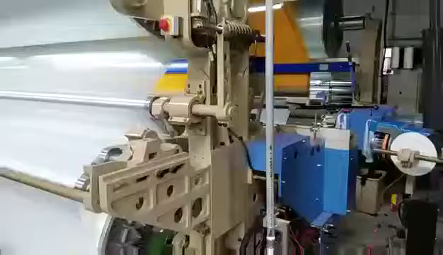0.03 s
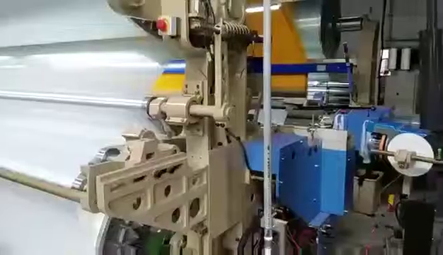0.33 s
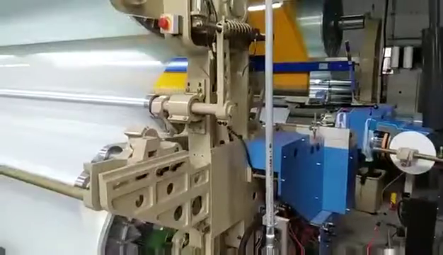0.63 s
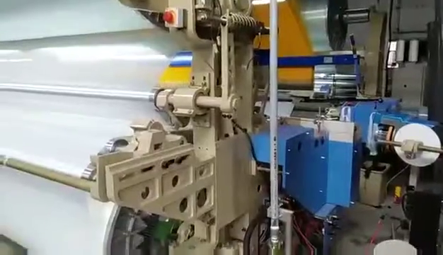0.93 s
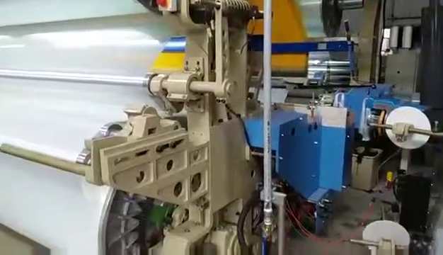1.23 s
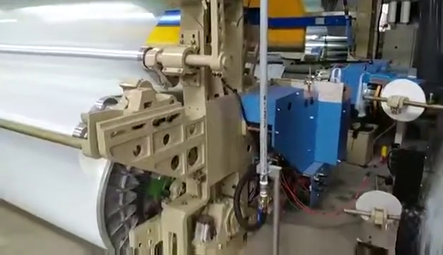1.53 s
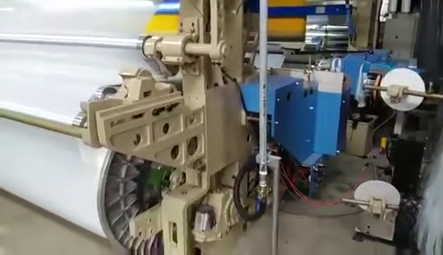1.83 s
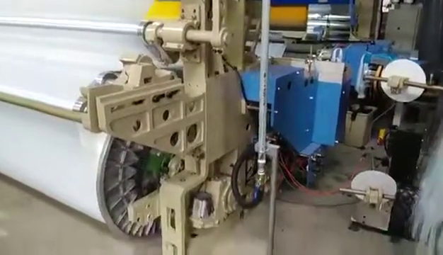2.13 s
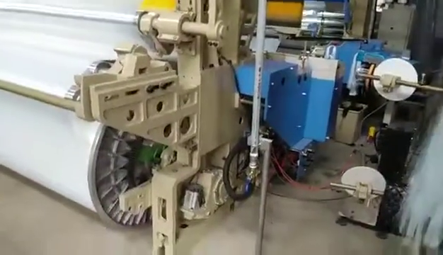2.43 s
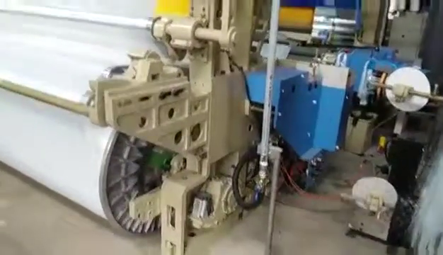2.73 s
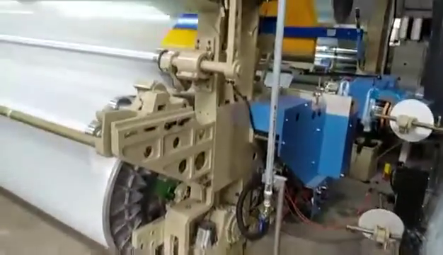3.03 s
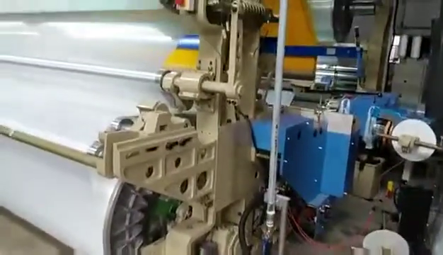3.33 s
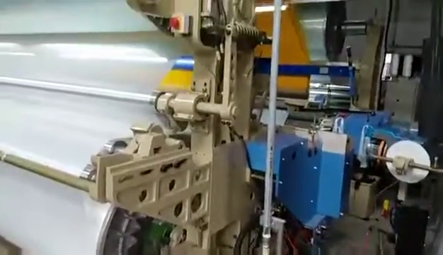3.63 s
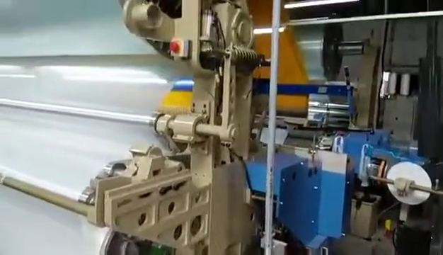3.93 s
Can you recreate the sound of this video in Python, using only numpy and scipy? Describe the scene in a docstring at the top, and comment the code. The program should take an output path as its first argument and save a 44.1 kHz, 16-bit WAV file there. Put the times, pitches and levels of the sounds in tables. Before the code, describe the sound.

Industrial loom pulsing rapidly with air bursts and metal rattle in a noisy mill.

```python
"""A jet loom weaves at nearly six picks a second, close to a moving phone in a roaring mill.
Each pick opens the hissing main nozzle, then the relay nozzles. The frame rattles, faint tones ring and
the reed beats up, over a drive that repeats every two picks, whining gears and the other looms.
The sound cuts in abruptly; 1.5 s later the phone's suppressor has learnt the roar and turns it down."""
import sys
import numpy as np
from scipy import signal
from scipy.fft import rfft, irfft
from scipy.io import wavfile
from scipy.ndimage import uniform_filter1d, minimum_filter1d, map_coordinates

SR = 44100
rng = np.random.default_rng(int(sys.argv[2]) if len(sys.argv) > 2 else 0)


def transcribe(signal):
    """Save signal, clipped to [-1, 1], as a 16-bit WAV file at the path in sys.argv[1]."""
    frames = np.atleast_2d(signal).T
    limited = np.clip(frames, -1, 1)
    pcm = np.round(limited * 32767).astype(np.int16)
    wavfile.write(sys.argv[1], SR, pcm)


N = 176400
TIME_S, BIN_HZ = np.arange(N) / SR, np.arange(N // 2 + 1) * SR / N
FIRST_PICK_S, PICK_S = 0.4035, 0.17359

# Level shifts as the phone moves. Each row: time in seconds, hiss gain in dB, rattle gain in dB.
PHONE_MOVES = [(.35, -2, -0.5), (1.1, 0, -8), (1.8, -1, -8), (2.2, -1, -2), (2.8, -1.5, 0), (3.3, -1.5, -1),
               (3.58, -1, -5.5), (3.76, -1.5, -3.5), (3.93, 1, 3.5)]


def nozzles(sputter_db=0.75):
    """The main nozzle shoots the weft in a sputtering air burst; the relay nozzles carry it across."""
    # Air noise spectra. Each row: frequency in Hz, left and right density in dB per Hz.
    main_spectrum = [(700, -67, -63), (2000, -81, -67), (3750, -74, -63), (4600, -45.5, -49.5),
                     (4810, -51, -52), (5460, -59.5, -55), (6100, -61, -62.5), (7040, -55, -80),
                     (7640, -52.5, -59), (8100, -53.5, -92), (9350, -54, -69), (9870, -54, -75),
                     (10650, -65, -101)]
    relay_spectrum = [(686, -61.5, -63), (1860, -49.5, -53), (3070, -53.5, -51.5), (4600, -52.5, -48),
                      (5480, -65.5, -64), (6050, -66, -66.5), (8000, -66, -77), (9400, -59.5, -70.5),
                      (11000, -66.5, -91)]
    sputter = undb(sputter_db * wander(per_s=300))
    main = colour(rng.standard_normal((2, N)), main_spectrum) * sputter
    main *= pick_envelope(delay_s=0, rise_s=0.0045, hold_s=0.049, fade_s=0.019)
    relay = colour(rng.standard_normal((2, N)), relay_spectrum)
    relay *= pick_envelope(delay_s=0, rise_s=0.035, hold_s=0.086, fade_s=0.026)
    return main + relay


def frame_rattle(left_db=-17.5, right_db=-31):
    """Each blow shakes loose small impacts that ring the frame, harder on every second pick."""
    # Blows on the frame. Each row: delay after the pick in seconds, relative dB, decay in seconds.
    blows = [(.012, -5.5, .015), (0.038, 3, .02), (0.058, 3, 0.015), (.078, 0.5, 0.034), (.104, -14, .015),
             (0.122, -17, 0.016)]
    # Frame modes. Each row: frequency in Hz, relative energy in dB, T60 in seconds.
    modes = [(291, -13, 0.1), (517, -3, 0.034), (668, -10.5, 0.052), (951, -2.5, 0.039), (1082, -1, 0.057),
             (1420, 3.5, 0.0082), (1550, -4, 0.021), (1660, -7, 0.028), (2090, -5.5, 0.042),
             (2510, 2, 0.044), (2850, -12, 0.059), (4240, -11, 0.027)]
    force = np.sqrt(sum((undb(db) * pick_envelope(delay_s, 0.0012, 0, decay_s, accent_db=1.54)) ** 2
                        for delay_s, db, decay_s in blows))
    t = np.arange(SR // 5) / SR
    ring = np.zeros(len(t))
    for hz, db, t60_s in modes:
        envelope = undb(db) / np.sqrt(t60_s) * np.exp(-np.log(1000) * t / t60_s)
        ring += envelope * np.sin(2 * np.pi * (hz * t + rng.random()))
    impacts = clicks(per_s=2400, spread_db=3.5) * force
    rattle = signal.fftconvolve(impacts, ring[None], axes=1)[:, :N]
    return rattle / rattle.std() * undb([[left_db], [right_db]])


def beat_up(rise_s=0.0031, fade_s=0.017):
    """Reed and shedding gear thud in a pattern two picks long."""
    # Thud pattern. Each row: start within the cycle in seconds, gain in dB.
    thuds = [(0.017, -1.5), (0.047, 0.5), (0.078, -2), (0.114, 3), (.25, 2), (0.28, 4.5)]
    # Dull thud spectrum. Each row: frequency in Hz, left and right density in dB per Hz.
    spectrum = [(61, -68, -78), (123.2, -47.5, -48.5), (202, -56.5, -55.5), (260, -46.5, -52.5),
                (325, -49.5, -54), (508, -56.5, -62), (900, -69.5, -87)]
    force = np.sqrt(sum((undb(db) * pick_envelope(start_s, rise_s, 0, fade_s, picks=2)) ** 2
                        for start_s, db in thuds))
    return colour(rng.standard_normal((2, N)) * force, spectrum)


def drive(throb_db=2.5):
    """The shedding gear's rumble repeats every two picks and throbs at random; shafts hum in step."""
    # Rumble spectrum. Each row: frequency in Hz, density in dB per Hz.
    spectrum = [(20, -80), (45, -54), (60, -78), (100, -47.5), (140, -52.5), (250, -50), (500, -56),
                (1000, -55.5), (2000, -82)]
    # Shaft hum. Each row: cycles per pick, left rms level in dB.
    partials = [(4.5, -35), (5, -26.5), (12.5, -43), (17.5, -36.5)]
    cycle = round(2 * PICK_S * SR)
    rumble = colour(rng.standard_normal((2, cycle))[:, np.arange(N) % cycle], spectrum)
    hum = sum(np.sqrt(2) * undb(db) * np.sin(2 * np.pi * (per_pick * TIME_S / PICK_S + rng.random()))
              for per_pick, db in partials)
    return rumble * undb(throb_db * wander(per_s=18)) + hum * np.array([[1], [-0.87]])


def gear_whine():
    """Gears and spindles sing in narrow, unsteady lines."""
    # Whine lines. Each row: centre in Hz, width in Hz, left and right level in dB.
    lines = [(927, 37, -31, -40), (1476, 43, -28.5, -37), (1704, 14, -38, -45), (2125, 39, -36, -41),
             (2490, 25, -38.5, -38), (4250, 100, -46, -32), (7750, 120, -39, -57)]
    gain = sum(undb([[left], [right]]) * np.exp(-((BIN_HZ - hz) / width_hz) ** 2) / np.sqrt(width_hz)
               for hz, width_hz, left, right in lines)
    return irfft(rfft(rng.standard_normal((2, N))) * gain, N) * np.sqrt(SR / 2)


def brief_tones(per_s=700, low_hz=552, high_hz=5022, mean_t60_s=0.062, range_db=12.5):
    """Faint, brief tones ring at random, each at its own pitch."""
    # Spectrum of the tones. Each row: frequency in Hz, left and right band level in dB.
    spectrum = [(494, -62, -66), (963, -56.5, -63), (1482, -61.5, -66.5), (2530, -66, -67.5),
                (4330, -71.5, -66.5), (5200, -74, -72)]
    t = np.arange(SR // 8) / SR
    tones = np.zeros((2, N + len(t)))
    for when, pitch, size, length, stream in rng.random((round(per_s * N / SR), 5)):
        hz = low_hz + (high_hz - low_hz) * pitch
        t60_s = mean_t60_s * (0.5 + length)
        ring = np.sin(2 * np.pi * hz * t) * np.exp(-np.log(1000) * t / t60_s)
        start = int(when * N)
        tones[int(2 * stream), start:start + len(t)] += undb(range_db * size) * ring
    return colour(tones[:, :N] / tones.std(), spectrum)


def hall_roar():
    """The clatter of many looms merges into a steady roar."""
    # Roar spectrum. Each row: frequency in Hz, left and right density in dB per Hz.
    spectrum = [(19.8, -55, -45.5), (60, -55.5, -57.5), (117, -50, -52), (256, -48.5, -53.5),
                (403, -49.5, -52.5), (570, -50, -60.5), (970, -47.5, -54), (1440, -42.5, -49),
                (2010, -50, -53), (2960, -52, -55.5), (3930, -52.5, -47.5), (4710, -57, -53),
                (5220, -62, -62.5), (6300, -66, -69), (7700, -65.5, -75), (8840, -59.5, -81),
                (10540, -68, -109)]
    return colour(clicks(per_s=9000, spread_db=2), spectrum)


def pick_envelope(delay_s, rise_s, hold_s, fade_s, accent_db=0, picks=1, scatter_db=0.36):
    """Rise, hold and fade recurring in step with the picks; the accent alternates up and down."""
    def shape(age_s):
        return np.minimum(age_s / rise_s, 1) * np.exp(-np.maximum(age_s - rise_s - hold_s, 0) / fade_s)

    period_s = picks * PICK_S
    cycle, age_s = np.divmod(TIME_S - FIRST_PICK_S - delay_s + 4 * period_s, period_s)
    cycle = cycle.astype(int)
    size = undb(scatter_db * rng.standard_normal(40) + accent_db * (-1) ** np.arange(40))
    return size[cycle + 1] * shape(age_s) + size[cycle] * shape(age_s + period_s)


def clicks(per_s, spread_db):
    """Two streams of random clicks of uneven size, rms 1."""
    hits = (rng.random((2, N)) < per_s / SR) * np.sign(rng.standard_normal((2, N)))
    hits *= undb(spread_db * rng.standard_normal((2, N)))
    return hits / hits.std()


def wander(per_s):
    """Random values joined by ramps; spread near 1."""
    return 1.2 * np.interp(TIME_S * per_s, np.arange(2048), rng.standard_normal(2048))


def colour(pair, spectrum):
    """Mixes two unrelated signals into the left and right microphones and shapes their spectra."""
    # Microphone likeness, opposed in the bass. Each row: frequency in Hz, correlation.
    likeness = [(30, -0.86), (80, -0.86), (130, -0.85), (250, -0.85), (500, -0.65), (1000, -0.48),
                (1600, -0.049), (10000, -0.093)]
    correlation = log_interp(likeness, BIN_HZ)[0]
    mid, side = rfft(pair) * np.sqrt([(1 + correlation) / 2, (1 - correlation) / 2])
    gain = undb(log_interp(spectrum, BIN_HZ))
    return irfft(np.array([mid + side, mid - side]) * gain, N) * np.sqrt(SR / 2)


def log_interp(table, hz):
    """A table's columns, interpolated over log frequency."""
    row_hz, *columns = np.array(table, float).T
    return np.array([np.interp(np.log(hz + 1e-3), np.log(row_hz), column) for column in columns])


def undb(db):
    """Decibels to gain."""
    return 10 ** (np.asarray(db) / 20)


def band_ripple(x, ripple_db=1.78, notch_db=2, ripple_hz=75, ripple_s=0.075, hiss_hz=4500):
    """Narrow bands swell and sink at random, and the hiss level shifts."""
    hz, t, bands = signal.stft(x, SR, nperseg=2048, noverlap=1536)
    grid = np.meshgrid(hz / ripple_hz, t / ripple_s, indexing="ij")
    ripple = map_coordinates(rng.standard_normal((512, 128)), grid, mode="mirror")
    move_s, hiss_db, _ = np.array(PHONE_MOVES).T
    octaves = np.log2((hz[:, None] + 1) / hiss_hz)
    shift_db = np.exp(-(octaves / 0.42) ** 2) * np.interp(t, move_s, hiss_db)
    bands *= undb(ripple_db * ripple - notch_db * np.minimum(ripple, 0) ** 2 + shift_db)
    return signal.istft(bands, SR, nperseg=2048, noverlap=1536)[1][:, :N]


def suppressor(x, learn_s=1.56, engage_s=0.25, smooth_s=0.053, smooth_hz=149.74, hole_db=13):
    """Takes each band's recent minimum as steady noise; cuts more the nearer the band is to it."""
    # Suppression depth. Each row: frequency in Hz, left and right cut in dB.
    depths = [(30, 9.5, 11), (89.5, 12.5, 15), (149, 7, 9.5), (217, 9.5, 8.5), (303, 8, 14.5),
              (520, 10, 11.5), (590, 13, 13), (786, 10, 10), (870, 8, 9.5), (1500, 13, 14),
              (1740, 14.5, 16.5), (2240, 11.5, 11.5), (2480, 16.5, 13.5), (3960, 14, 15.5),
              (5500, 11.5, 11.5), (6650, 4, 5.5), (7900, 0, -1.5), (11000, -0.5, 3)]
    hz, t, bands = signal.stft(x, SR, nperseg=1024, noverlap=896)
    learn, engage, smooth, half_pick = (round(s / t[1]) for s in (learn_s, engage_s, smooth_s, PICK_S / 2))
    power = uniform_filter1d(abs(bands) ** 2, round(smooth_hz / hz[1]), axis=1)
    power = np.maximum(uniform_filter1d(power, smooth, axis=2), 1e-18)
    slow_power = np.maximum(uniform_filter1d(power, half_pick, axis=2, origin=(half_pick - 1) // 2), 0)
    noise = minimum_filter1d(slow_power, learn, axis=2, origin=(learn - 1) // 2, mode="constant")
    nearness = 2.63 * noise / power
    # Bands that sink into the noise get an extra cut, mostly below 980 Hz.
    hole = np.interp(nearness.mean(0), [1.41, 2.23], [0, 1]) / (1 + (hz[:, None] / 980) ** 2)
    cut_db = log_interp(depths, hz)[:, :, None] * np.minimum(nearness, 1) ** 0.35 + hole_db * hole
    engaged = uniform_filter1d(1. * (noise > 1e-12), engage, axis=2, origin=(engage - 1) // 2)
    return signal.istft(bands * undb(-engaged * cut_db), SR, nperseg=1024, noverlap=896)[1][:, :N]


def limiter(x, threshold_db=-11, window_s=0.02, ratio=2.2, ceiling=1.44):
    """Holds each channel down when loud and rounds the highest peaks."""
    rms = np.sqrt(np.maximum(uniform_filter1d(x ** 2, round(window_s * SR), axis=1), 1e-12))
    held = x * np.minimum(undb(threshold_db) / rms, 1) ** (1 - 1 / ratio)
    return ceiling * np.tanh(held / ceiling)


def bass_flicker(x, below_hz=296, flicker_db=3.5, cap_db=4.5):
    """The bass that both sides share flickers and dips."""
    # Shared bass contour. Each row: time in seconds, gain in dB before flicker and cap.
    contour = [(0.379, 2), (.43, -7), (.48, 3), (.52, -12), (.575, 8), (.64, -16), (.7, 4.5), (.745, 5),
               (.775, -11), (.81, 5), (.88, 0), (.925, -3), (.955, -3), (1.0, -5), (1.04, 10), (1.09, -6),
               (1.16, 1), (1.22, -7), (1.28, -2), (1.325, -24), (1.385, -1), (1.45, -24), (1.52, -5),
               (1.585, -61), (1.7, -34), (1.78, 1.5), (1.9, -15), (1.991, -2), (2.8, 8)]
    bass = signal.sosfiltfilt(signal.butter(4, below_hz, fs=SR, output="sos"), x.mean(0))
    gain_db = np.interp(TIME_S, *np.array(contour).T) + flicker_db * wander(per_s=18)
    return x + bass * (undb(np.minimum(gain_db, cap_db)) - 1)


def scene():
    """The near loom within the hall, heard from a moving hand."""
    move_s, _, rattle_db = np.array(PHONE_MOVES).T
    rattle_gain = undb(np.interp(TIME_S, move_s, rattle_db))
    near = nozzles() + rattle_gain * frame_rattle() + brief_tones() + beat_up() + drive()
    return band_ripple(near + gear_whine() + hall_roar())


def record(dry):
    """The phone starts abruptly, suppresses steady noise, limits the level and cuts the extremes."""
    start_s, fade_in_s, low_hz, top_hz = 0.3473, 0.0073, 18, 10600
    opened = dry * np.clip((TIME_S - start_s) / fade_in_s, 0, 1)
    held = bass_flicker(limiter(suppressor(opened)))
    held = signal.sosfilt(signal.butter(2, low_hz, "high", fs=SR, output="sos"), held)
    return signal.sosfilt(signal.ellip(10, 0.2, 80, top_hz, fs=SR, output="sos"), held)


dry = scene()
out = record(dry)
transcribe(out)
```